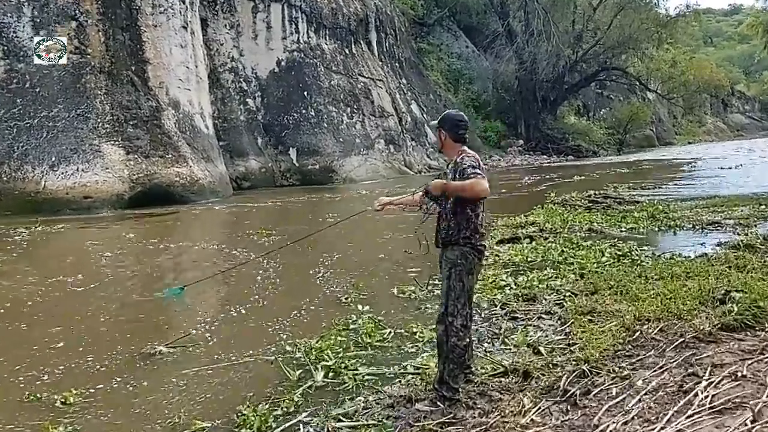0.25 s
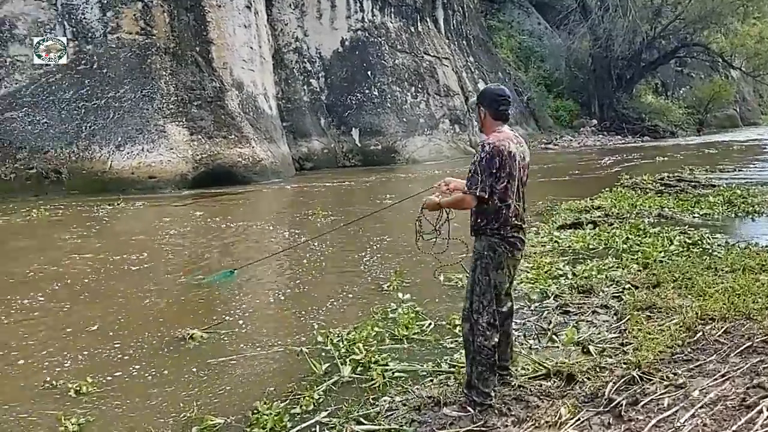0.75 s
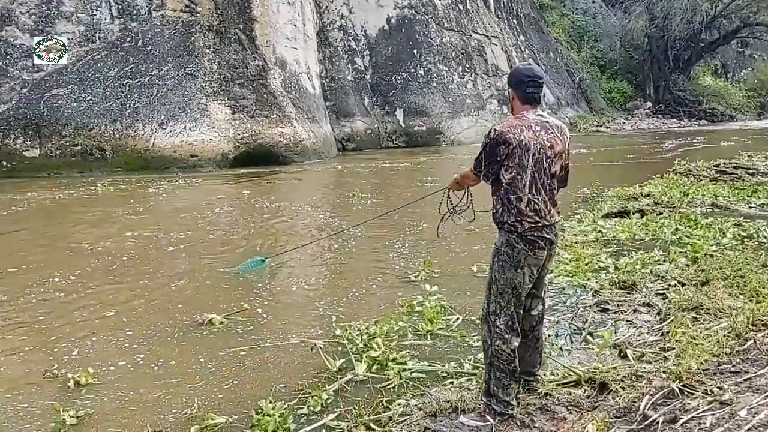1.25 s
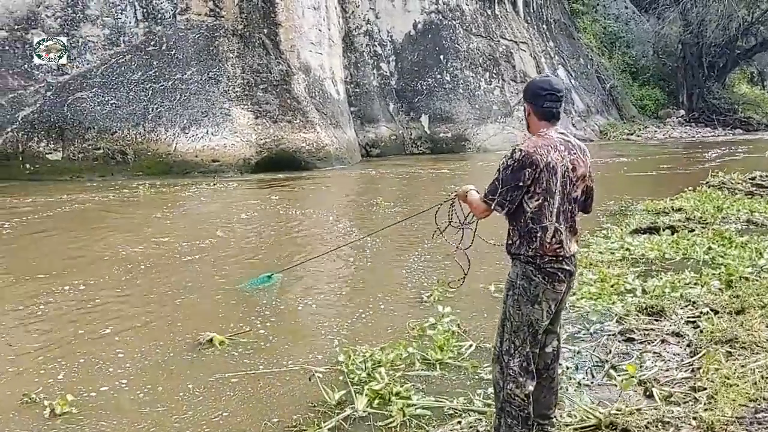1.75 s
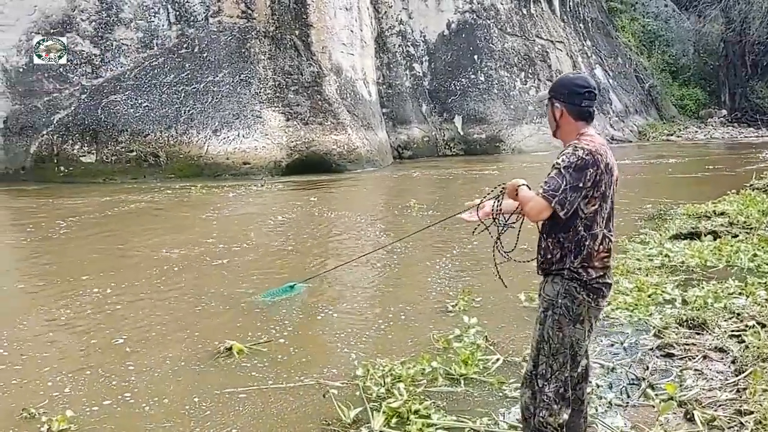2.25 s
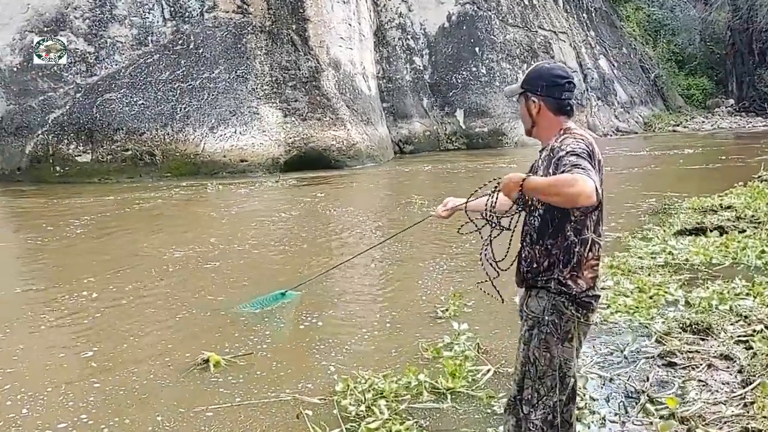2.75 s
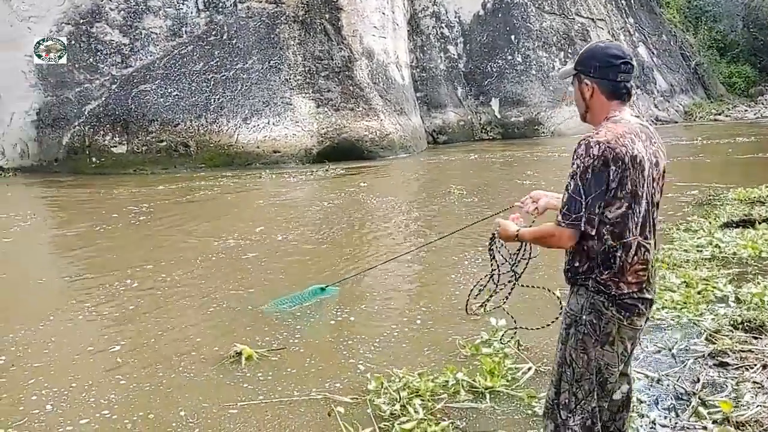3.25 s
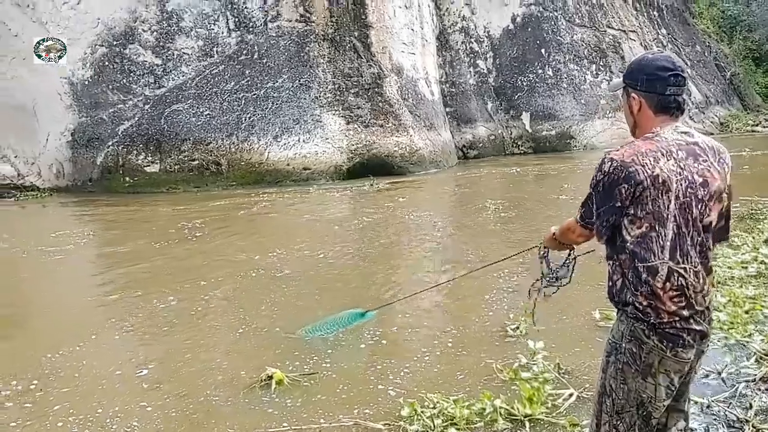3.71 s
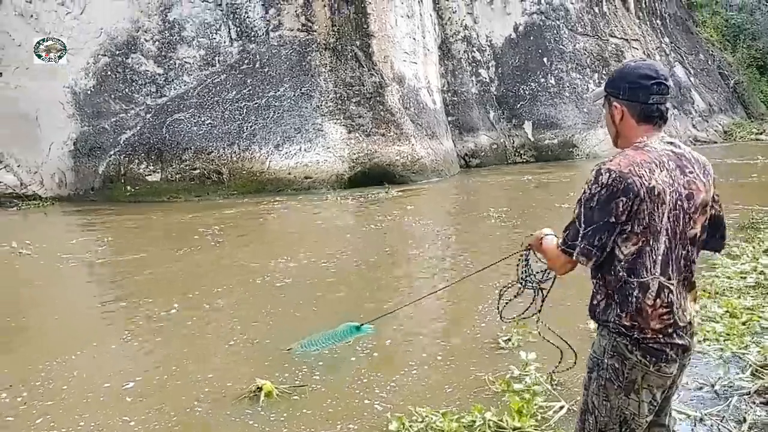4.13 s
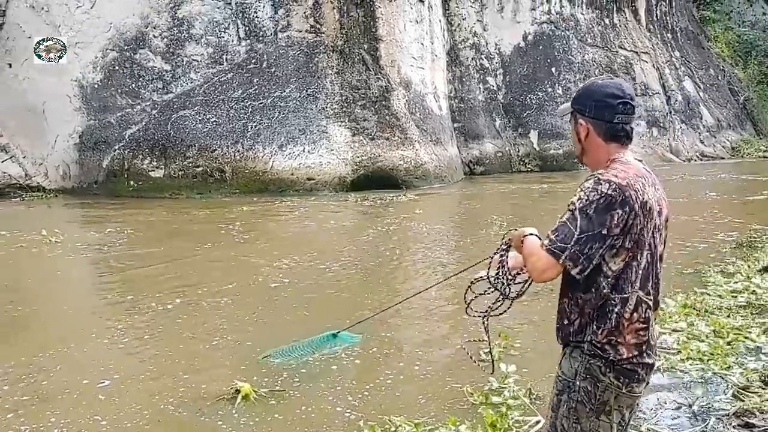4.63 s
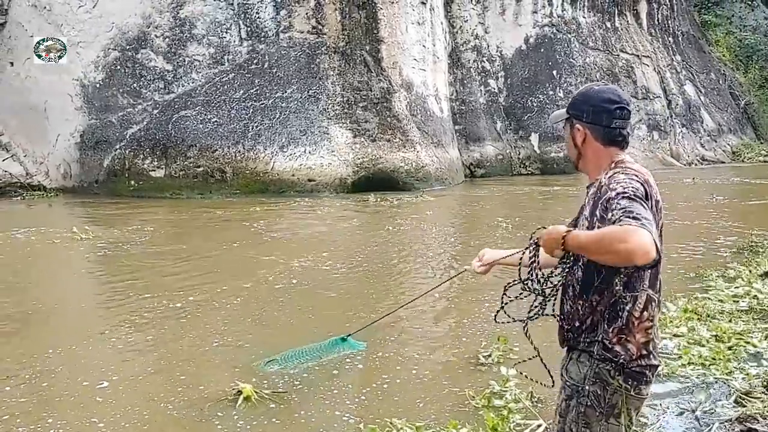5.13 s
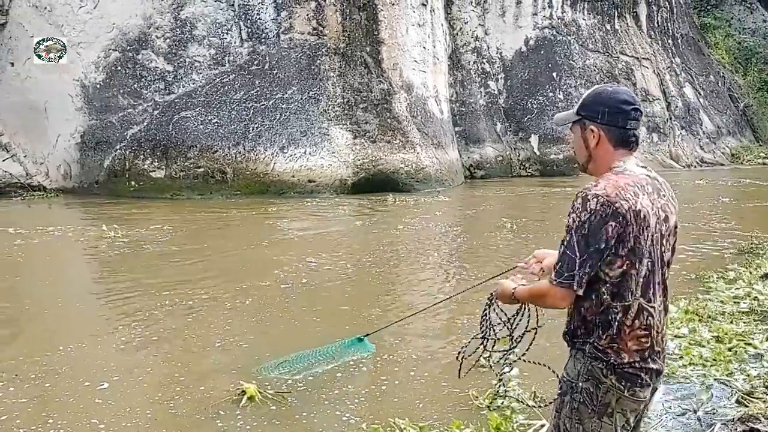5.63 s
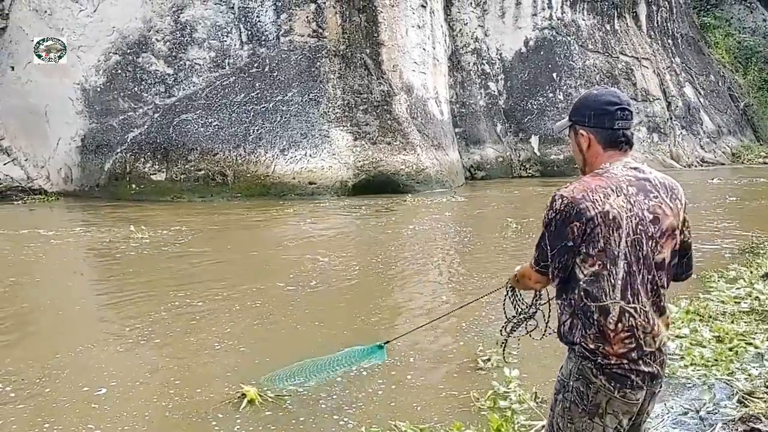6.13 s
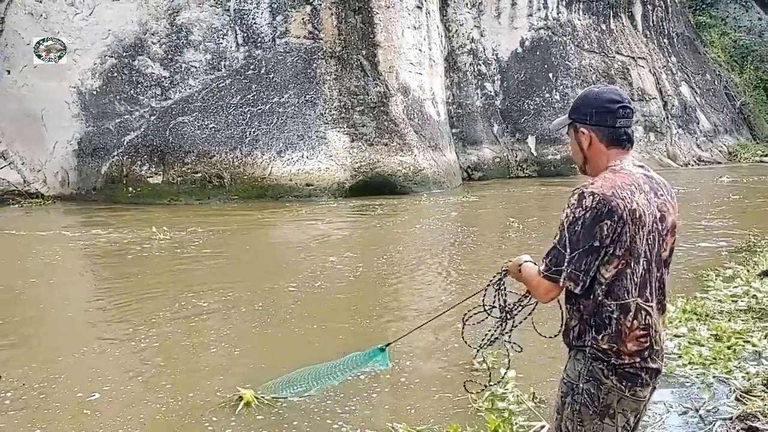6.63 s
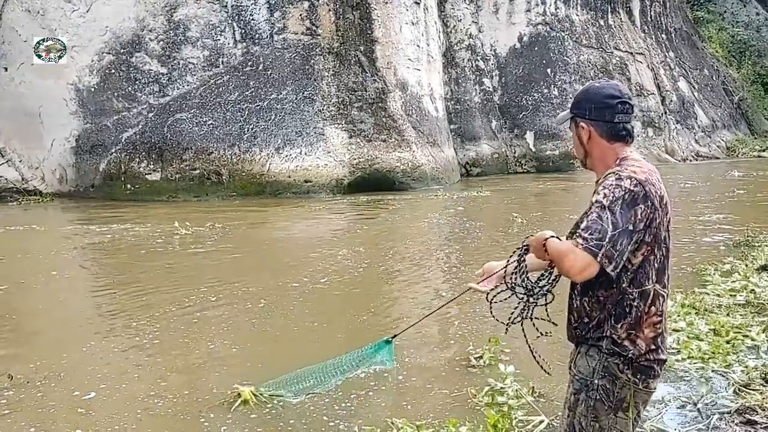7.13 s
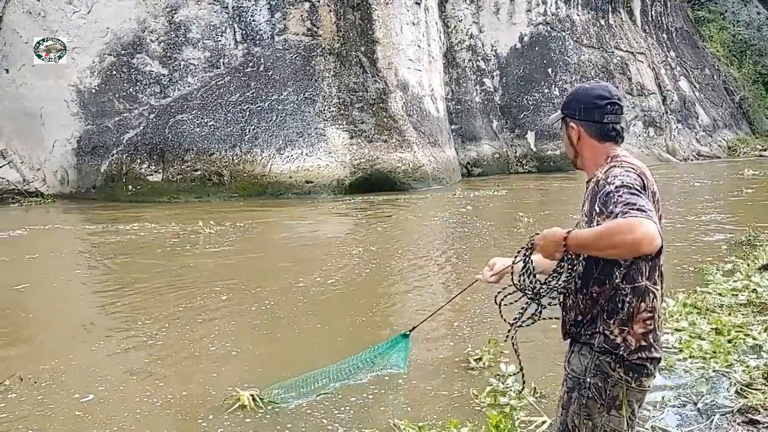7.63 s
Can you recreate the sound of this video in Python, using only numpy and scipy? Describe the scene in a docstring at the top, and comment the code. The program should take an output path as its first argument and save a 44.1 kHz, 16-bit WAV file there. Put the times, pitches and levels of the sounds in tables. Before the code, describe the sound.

Close stereo outdoor sound on a riverbank, without room echo. At 0 s a foot presses into dry reeds with a short crackle; scattered light snaps and rustles follow until about 1 s. At 1.4 s a sole drags with a brief rasp and a firm, bright crunch lasts to about 1.7 s, then settles. From 2.4 to 2.7 s another step crushes stalks, with a soft low thud. The strongest, sharpest snapping runs from 3.3 to 3.7 s, ending in a second dull thud. From 4 to 6 s the walker stands: only sparse ticks, small creaks and faint rustles, dwindling. Throughout, a river flows very quietly, with a barely audible high insect buzz. Between 6.2 and 7.3 s a distant bird gives a few faint gliding whistles, with one tiny watery plip near 6.6 s. The feet start slightly right and move to the centre.

```python
"""Slow footsteps crunch over dry reeds on a riverbank, just under a hand-held stereo recorder.
Each step is a dense crowd of tiny random fractures over rubbing noise, with timed snaps of single stalks,
a dragged sole and two dull thuds; then the walker stands and the litter only creaks and ticks.
Behind it a river flows quietly, as filtered noise with one bubble, with a faint band of insect noise
and the gliding sine whistles of a distant bird."""
import sys
import numpy as np
from scipy import signal
from scipy.fft import rfft, irfft
from scipy.io import wavfile
from scipy.ndimage import uniform_filter1d

SR = 44100
rng = np.random.default_rng(int(sys.argv[2]) if len(sys.argv) > 2 else 0)


def generate_wav(signal):
    """Clip the signal to [-1, 1] and save it as 16-bit WAV at the path in sys.argv[1]."""
    frames = np.transpose(np.atleast_2d(signal))
    scaled = np.clip(frames, -1, 1) * 32767
    pcm = np.round(scaled).astype(np.int16)
    wavfile.write(sys.argv[1], SR, pcm)


N = 346395
TIME = np.arange(N) / SR
SIDES = np.array([[1], [-1]])  # left, right
STALK_SIZE, LEAD = 2048, 192  # samples in one fracture, and those ahead of the break


def undb(db):
    """Decibels to gain."""
    return 10 ** (np.asarray(db) / 20)


def level(x, db):
    """Set the rms level."""
    return x * undb(db) / np.sqrt(np.mean(x ** 2))


def at(points, hz):
    """Read (f/Hz, value) points on a log-frequency axis."""
    f, value = np.transpose(points)
    return np.interp(np.log(hz + 1), np.log(f), value)


def smooth_twice(x, k):
    """Two running means of k samples."""
    return uniform_filter1d(uniform_filter1d(x, k), k)


def walk(rate):
    """Random levels held 1 / rate s and slewed twice; spread near 1."""
    k = int(SR / rate)
    steps = np.repeat(rng.standard_normal(N // k + 1), k)
    return 1.5 * smooth_twice(steps, k)[:N]


def pair(mid, side, likeness):
    """Left and right with the given correlation, from two unrelated signals."""
    c = np.clip(likeness, -.99, .99)
    return np.sqrt((1 + c) / 2) * mid + np.sqrt((1 - c) / 2) * side * SIDES


def bandpass(x, order, hz, width_hz):
    """Keep a band of the given width centred on hz."""
    edges = [hz - width_hz / 2, hz + width_hz / 2]
    return signal.sosfilt(signal.butter(order, edges, "band", fs=SR, output="sos"), x)


def tread():
    """Fine, thick, brittle and rubbing dB: each press loads, holds, lifts, and leaves the litter settling."""
    # a foot bears down on the litter, heel and sole in a step, lightly in a brush or a shift of weight:
    # t/s at full load, hold/s, crackle level/dB, easing during the hold/(dB per s),
    # thick stalks against fine fibres/dB, brittle top/dB, rubbing against breaking/dB
    presses = [(0.019, 0.14, -33, 113, -6, 5.5, -3.5), (0.226, 0.17, -56.5, 43, -7, -6, -17),
               (0.46, 0.045, -55.5, 60, -12, 0, -18), (0.559, .22, -48.5, 10.5, -16.5, 8, -4),
               (0.84, 0.085, -59, -4, -6.5, 2, -13), (1.422, 0.1, -31, 126, -6.5, 4.5, 3),
               (1.551, 0.114, -30, 98.5, -9, 4, 3), (2.105, 0.097, -49.5, 11, -13, 5.5, -9),
               (2.26, 0.2, -53, 11, -11, -11, 2), (2.353, 0.064, -48.5, 1, -9, 4, 7),
               (2.426, 0.25, -32.5, 41, -13.5, 4, -2), (2.601, 0.12, -33.5, 61, -7.5, 5, 0),
               (3.053, 0.08, -59, 3, -6, 7, 7), (3.137, 0.057, -52, -4, -13.5, 11.5, 13),
               (3.242, 0.074, -41, -2, -7.5, 1, -7), (3.306, 0.062, -32, 80, -10, -2.5, -11.5),
               (3.404, 0.0041, -35.5, 62, -9, -6.5, -6), (3.441, 0.035, -38, 63, -5.5, -1, -12),
               (3.515, 0.172, -40, 19, -7.5, 1, -19), (4.035, 0.032, -53.5, 30, -4.5, 1, 4),
               (4.131, 0.13, -56.5, 104, -2, 1, -24), (4.278, 0.15, -41, 79, -13, 4, -3),
               (4.469, 0.13, -56.5, 2, -7, -2, -4), (4.678, 0.15, -58, 22, -6, 3, -4),
               (4.829, 0.068, -47, 85, -9.5, -4, -13), (5.026, 0.14, -54.5, 92, -16, 0, -20),
               (5.394, 0.043, -63, 4, -16, 5, -18), (5.515, 0.15, -60.5, 13.5, -5, 3, -29)]
    load_db_per_s, lift_db_per_s = 561, 412.5  # how fast the crackle comes and goes with the weight
    # crushed litter goes on settling after the foot lifts
    settle_db, settle_db_per_s = -21, 30.5
    settled_colour_db = np.array([-1, -6, 6])  # thick, brittle, rubbing: it rubs more than it breaks
    power, colour = 1e-18, 1e-18
    for s, hold_s, db, ease_db_per_s, *colour_db in presses:
        before = np.maximum(s - TIME, 0)
        after = np.maximum(TIME - s - hold_s, 0)
        held_db = db - load_db_per_s * before - ease_db_per_s * np.clip(TIME - s, 0, hold_s)
        crush = undb(held_db - lift_db_per_s * after) ** 2
        settle = undb(held_db + settle_db - settle_db_per_s * after) ** 2
        power = power + crush + settle
        # the louder of overlapping presses sets the colour
        colour = colour + np.outer(colour_db, crush) + np.outer(settled_colour_db, settle)
    fine = 10 * np.log10(power)
    thick, brittle, rubbing = colour / power
    return fine, fine + thick, brittle, rubbing


def crunch(rate=800, crowding=.3, top_db=0.5, fine_db=0, thick_db=0, size_db=4.5, rub_db=0.5,
           patchy_db=4.5, count=10):
    """Many small fractures, denser under more weight, over the rub of dry leaves."""
    hold_s, bunching_db = .024, 2.5
    brittle_hz = 10660  # the brittle top of dry fibres lies above this pitch
    fine, thick, brittle, rubbing = tread()
    # one fracture overloads its neighbours, so they come in bunches
    per_second = rate * undb(crowding * (fine + 42.5) + bunching_db * walk(160))
    chance = per_second / count / SR  # per sample, for each kind of fibre
    rub_size = undb(rubbing + rub_db) * np.sqrt(chance)
    body, crackle = 0, 0
    for tick_hz in np.linspace(4800, 11000, count):
        breaks = rng.random(N) < chance
        sizes = undb(size_db * np.minimum(rng.exponential(size=N), 4))
        rub = rub_size * rng.standard_normal(N)
        low, middle, top = stalk(break_s=0.00009, ring_db=-14, tick_hz=tick_hz)
        # the load passes from one kind of fibre to another
        force = ((breaks * sizes + rub) * undb(patchy_db * walk(45)))[None]
        # thin fibres tick high, thick ones crack lower and with more body
        thin = tick_hz / 7500
        upper = middle / thin + undb(top_db) * thin * top
        body = body + signal.oaconvolve(force, low / thin, axes=1)[:, LEAD:LEAD + N]
        crackle = crackle + signal.oaconvolve(force, upper, axes=1)[:, LEAD:LEAD + N]
    highpass = signal.butter(4, brittle_hz, "high", fs=SR, output="sos")
    crackle = crackle + (undb(brittle) - 1) * signal.sosfiltfilt(highpass, crackle)

    def driven(x, db):
        """The foot sets how much energy the fractures release."""
        power = smooth_twice(np.mean(x ** 2, axis=0), int(hold_s * SR))
        return x * undb(db) / np.sqrt(np.abs(power) + 1e-12)
    return driven(body, thick + thick_db) + driven(crackle, fine + fine_db)


def snaps(gain_db=-1, pan_spread_db=1.0, early_s=0.0001, woodiness=0.55, thin_db=-7,
          full_split_s=0.0041, split_growth=.3):
    """Single stalks give way, each at its own place under the foot."""
    # the loudest single stalks breaking: t/s, crack level/dB (energy taken over window_s, before gain_db),
    # woody body against the crack/dB, top against middle/dB, tick f/Hz
    breaking = [(0.0686, -42.5, 6, 11, 11200), (0.1076, -42, -9, 1, 5050), (0.115, -35, -7, 12, 9600),
                (0.1788, -54, -13, 7, 8270), (0.2386, -48, -12, -8, 6100), (0.2856, -48, -13, 1, 4500),
                (0.315, -53, -8, -3, 5370), (0.3438, -54, -11, 0, 13000), (0.4204, -47, -12, -2, 5240),
                (0.4272, -50, -8, 0, 5500), (0.447, -31.5, -10.5, 5.5, 9400), (0.476, -50, -14, 7, 10570),
                (0.492, -53.5, 3.5, 9, 6100), (0.549, -42.5, -10, -11, 4080), (0.634, -35, -29, 4.5, 13300),
                (0.7391, -36, -20.5, 23, 9400), (0.8076, -44, -8.5, 0, 9500), (0.891, -54, -7, 2, 4400),
                (0.957, -48, -8, 11, 11900), (0.999, -49.5, -8.5, 2, 5500), (1.4157, -31.5, -9, 15, 10400),
                (1.4272, -29, -9, 8, 10300), (1.4424, -29, -7.5, 2, 5500), (1.4567, -34.5, -12, 5, 4600),
                (1.514, -34, -28, 15, 14100), (1.555, -25, -22, 3, 5300), (1.561, -28, -24, 14, 10000),
                (1.566, -22.5, -21, 6, 9650), (1.579, -34.5, 0.5, 5, 5100), (1.61, -28.5, -14, 1, 8800),
                (1.689, -37.5, -28, 17, 14600), (1.826, -43.5, -1.5, 10, 10400),
                (2.426, -36.5, -10, 7, 5640), (2.4442, -33, -4, 4, 5200), (2.46, -28, -15, 3, 9550),
                (2.4791, -27.5, -19, 3, 5200), (2.4985, -28.5, -10.5, -1, 6400),
                (2.549, -26.5, -24, 10, 8750), (2.572, -22.5, -15, 4.5, 9900), (2.6155, -23, -31, 7, 13100),
                (2.6199, -30, -11, 2, 9500), (2.6274, -26, -26, 11, 9200), (2.652, -28, -37, 10, 11900),
                (2.6716, -28, -5.5, 17, 5130), (2.6783, -33, -5.5, 7, 5500), (2.695, -32, -9.5, 5, 9700),
                (2.9626, -39.5, -13, -0.5, 6560), (3.3029, -22.5, -6.5, 0, 9900),
                (3.3118, -23, -12.5, 3, 9600), (3.363, -24, -22, -1, 5500), (3.3759, -27, -17, 4, 10570),
                (3.3793, -25.5, -10, -8, 5340), (3.4064, -15.5, -16, 3, 11000),
                (3.4374, -28.5, -15, -5, 4510), (3.445, -24.5, -24, 0, 10400),
                (3.455, -24, -12.5, -1, 9700), (3.4793, -37.5, -3, 0, 5050), (3.501, -34.5, -22, 6, 9700),
                (3.5122, -35, -15, 6, 9650), (3.538, -26, -12, 10, 11300), (3.5569, -31.5, -13.5, 2, 10100),
                (3.582, -32.5, -22, 6, 9400), (3.6076, -34, -5, 11, 9600), (3.6198, -27, 4.5, 0, 4500),
                (3.6303, -34.5, -6.5, -1, 4600), (3.6397, -27, -18, 3, 6400),
                (3.668, -34.5, -7.5, 13, 9650), (3.696, -30.5, -13, 0.5, 9200),
                (3.8934, -45.5, -29, 12, 13700), (4.0545, -43.5, 0, 3, 10500),
                (4.0917, -37.5, -20, 5.5, 11200), (4.218, -46.5, -10, 5.5, 10900),
                (4.2886, -38.5, -16, -5, 5300), (4.3157, -36.5, -32, 1, 5500),
                (4.392, -36.5, -10.5, -3, 7240), (4.447, -50, -9, 1, 14200), (4.4717, -43, -13, 7, 10100),
                (4.7576, -47.5, -7, 10, 7800), (4.769, -44, -2, 2, 10500), (4.8398, -40, -2.5, 2, 5600),
                (4.8972, -37, -12.5, 11.5, 9400), (5.0602, -49, -13, 1, 8160), (5.1303, -50.5, -9, 6, 7700),
                (5.1915, -51, -23, 6, 7300), (5.2208, -54, 2.5, -3, 4500), (5.2566, -46, -25, 13, 8320),
                (5.466, -49, -13, 0, 5200), (5.63, -50, -11, -3, 8300), (5.838, -46, -11, 8, 8300),
                (5.924, -57.5, -7, 4, 13600), (6.7193, -59, -17, -4, 6480)]
    window_s = .005
    out = np.zeros((2, N + STALK_SIZE))
    for s, db, body_db, bright_db, tick_hz in breaking:
        middle, top = np.array([1, undb(bright_db)]) / np.hypot(1, undb(bright_db))
        # the more its body outweighs its crack, the thicker the stalk
        knock_db = woodiness * max(body_db - thin_db, 0)
        # a louder break splinters for longer; a thick stalk breaks clean
        split_s = full_split_s * undb(split_growth * db - 2 * knock_db)
        bands = stalk(break_s=0.00073, ring_db=-10 - knock_db, tick_hz=tick_hz, split_s=split_s,
                      knock_db=knock_db, tick_db=9, tear_db=-8.5, own_db=4.0)
        crack = undb(db) * np.tensordot([undb(body_db), middle, top], bands, axes=1)
        place = undb(SIDES * pan_spread_db * rng.standard_normal() / 2)
        start = max(int((s - early_s - split_s / 2) * SR) - LEAD, 0)
        out[:, start:start + STALK_SIZE] += crack * place
    return out[:, :N] * undb(gain_db) * np.sqrt(window_s * SR)


def stalk(break_s, ring_db, tick_hz, split_s=0, knock_db=0, knock_hz=700, tick_db=6, tick_width_hz=1100,
          ground_db=-28, ground_s=0.019, tear_db=-13, tear_s=0.0026, spread_s=0.00184, own_db=3.5,
          alike_hz=3600):
    """One fracture as heard left and right, split in body, middle and top bands of unit energy."""
    # colour of breaking reeds at the microphone ports: f/Hz, level/dB
    reed = [(60, -26), (120, -19), (500, -16), (720, -14), (950, -9), (1150, -5), (1550, -4.5),
            (2420, -3.5), (3800, -8.5), (5450, 1), (7400, -6.5), (9300, -2.5), (10400, -4), (12500, -12),
            (14000, -8.5), (16000, -21)]
    # their stereo balance: f/Hz, left minus right/dB
    reed_balance = [(550, 1.5), (1200, -3), (1650, -6), (2500, -2), (3700, 9.5), (5200, -1), (6800, 4.5),
                    (8300, -0.5), (9800, -7.5), (13500, -5), (15500, 3.5)]
    # edges between body, middle and top: f/Hz
    band_edges = (3300, 7500)
    ring_s, likeness = .0022, .85
    t = (np.arange(STALK_SIZE) - LEAD) / SR
    hz = np.arange(STALK_SIZE // 2 + 1) * SR / STALK_SIZE
    # fibres start to tear; the split runs along the stalk and stops
    tear = undb(tear_db) * np.exp(-abs(t) / tear_s)
    split = np.exp(-np.maximum(t - split_s, 0) / break_s)
    # the hollow stalk rings briefly and the ground scatters it
    ring = undb(ring_db) * np.exp(-abs(t) / ring_s)
    ground = undb(ground_db) * np.exp(-abs(t) / ground_s)
    envelope = np.where(t < 0, tear, split + ring + ground)
    mid, side = rfft(rng.standard_normal((2, STALK_SIZE)) * envelope)
    sound = pair(mid, side, likeness / (1 + (hz / alike_hz) ** 4))
    # every stalk has one high resonance, a woody knock if it is thick, and an uneven body of its own
    tick = tick_db * np.exp(-((hz - tick_hz) / tick_width_hz) ** 2)
    knock = knock_db * np.exp(-np.log((hz + 1) / knock_hz) ** 2)
    own = np.column_stack([np.geomspace(300, 16000, 22), own_db * rng.standard_normal(22)])
    colour_db = at(reed, hz) + tick + knock + at(own, hz)
    sound = sound * undb(colour_db + SIDES * at(reed_balance, hz) / 2)
    # bending waves are dispersive: the top arrives first, the body a millisecond or two later
    delay = spread_s * rng.uniform(.6, 1.375) * np.exp(-hz / 5500)
    sound = sound * np.exp(-2j * np.pi * np.cumsum(delay) * hz[1])
    low, below_top = (1 / (1 + (hz / edge) ** 12) for edge in band_edges)
    bands = irfft(np.array([low, below_top - low, 1 - below_top])[:, None] * sound)
    return bands / np.sqrt(np.sum(bands ** 2, axis=(1, 2), keepdims=True) / 2)


def rasp(start_s=1.375, length_s=0.092, hz=2500, width_hz=350, db=-43):
    """A sole drags along a hollow stalk: a narrow band of noise around one pitch, swelling and fading."""
    u = np.clip((TIME - start_s) / length_s, 0, 1)
    # db is the rms level at the height of the swell
    return level(bandpass(rng.standard_normal(N), 1, hz, width_hz), db) * np.sin(np.pi * u)


def thuds(hz=74, rise_s=0.01):
    """The soft ground takes the weight with a single dull bounce."""
    # the sole meeting the ground: t/s, peak level of the envelope/dB
    landings = [(2.447, -64), (3.62, -58)]
    out = np.zeros(N)
    for s, db in landings:
        t = np.maximum(TIME - s, 0)
        envelope = t / rise_s * np.exp(1 - t / rise_s)
        out += undb(db) * envelope * np.sin(2 * np.pi * hz * t)
    return out


def river(swell_db=-0.07, ripple_db=0.83, lag_s=0.00041, river_db=-60.5):
    """Running water off to the left: octave bands swell together and ripple alone."""
    # colour of flowing water: f/Hz, level/dB
    water = [(18, -89), (30, -34.5), (70, -17), (118, -6.5), (328, -1), (866, -5.5), (1350, -8.5),
             (2120, -10.5), (2980, -21), (3220, -16.5), (5590, -23.5), (8300, -28.5), (10500, -33.5),
             (13700, -35), (16000, -35)]
    # its stereo balance: f/Hz, left minus right/dB
    water_balance = [(200, 0.0), (380, 1.5), (700, -0.5), (1290, -2.5), (2380, -3.5), (4400, 3.5),
                     (8120, -2.5), (15000, -1)]
    # likeness of the two channels: f/Hz, correlation
    water_likeness = [(150, .92), (300, 1), (700, 0.049), (1250, 0.63), (2100, 0.65), (4500, 0.041),
                      (15000, 0.08)]
    hz = np.arange(N // 2 + 1) * SR / N
    mid, side = rfft(rng.standard_normal((2, N)))
    flow = pair(mid, side, at(water_likeness, hz))
    flow = flow * undb(at(water, hz) + SIDES * at(water_balance, hz) / 2)
    # it reaches the left port first
    flow = flow * np.exp(1j * np.pi * hz * lag_s * SIDES)
    rest, swell, out = irfft(flow, N), walk(3.8), 0
    for edge in 200 * 2 ** np.arange(5):
        band = signal.sosfiltfilt(signal.butter(2, edge, fs=SR, output="sos"), rest)
        out = out + band * undb(swell_db * swell + ripple_db * walk(16))
        rest = rest - band
    return level(out + rest, river_db)  # the top above the last edge stays steady


def plip(s=6.598, hz=1550, glide_per_s=10, decay_s=0.012, db=-60):
    """One bubble in the river rings briefly and rises in pitch."""
    t = np.maximum(TIME - s, 0)
    return undb(db) * np.exp(-t / decay_s) * np.sin(2 * np.pi * hz * t * (1 + glide_per_s * t / 2))


def insects(waver_db=2):
    """A thin buzz from the far bushes: a band of noise that wavers slightly in level."""
    # the buzz: f/Hz, width/Hz, level before the waver/dB
    buzzes = [(9550, 920, -86.5)]
    out = 0
    for hz, width_hz, db in buzzes:
        buzz = level(bandpass(rng.standard_normal((2, N)), 2, hz, width_hz), db)
        out = out + buzz * undb(waver_db * walk(5.46))
    return out


def bird(waver=0.002, flutter_db=3.5):
    """A few whistles from far away: sines that glide and waver in pitch and flutter in level."""
    # t/s, length/s, start f/Hz, middle f/Hz, end f/Hz, rms level at the height before the flutter/dB
    whistles = [(6.22, 0.21, 3160, 3150, 3160, -80), (6.498, 0.07, 4100, 4850, 5250, -79.5),
                (6.6, 0.2, 3710, 3700, 3680, -85.5), (6.712, 0.1, 5400, 5100, 4450, -79),
                (7.195, .06, 4390, 4290, 4180, -78)]
    out, wobble = np.zeros(N), 1 + waver * walk(150)
    for s, length_s, *pitch_hz, db in whistles:
        u = np.clip((TIME - s) / length_s, 0, 1)
        hz = np.polyval(np.polyfit([0, .5, 1], pitch_hz, 2), u) * wobble
        tone = np.sqrt(2) * np.sin(2 * np.pi * np.cumsum(hz) / SR)
        out += undb(db) * np.sin(np.pi * u) * tone
    return out * undb(flutter_db * walk(50))


def scene():
    """Reeds underfoot in front of the river."""
    # where the feet are heard, first to the right, then ahead: t/s, left minus right/dB
    bearing = [(0, -1.5), (3.3, -0.5), (4.5, 0.5)]
    pan = undb(SIDES * np.interp(TIME, *np.transpose(bearing)) / 2)
    feet = (snaps() + crunch() + rasp()) * pan + thuds()
    return feet + river() + plip() + insects() + bird()


def record(dry, top_hz=15850):
    """The recorder cuts the top with a steep low-pass."""
    return signal.sosfilt(signal.ellip(10, .2, 70, top_hz, fs=SR, output="sos"), dry)


dry = scene()
out = record(dry)
generate_wav(out)
```